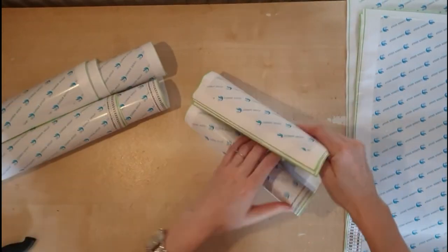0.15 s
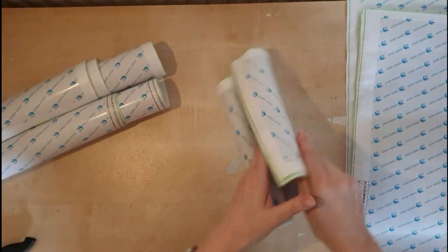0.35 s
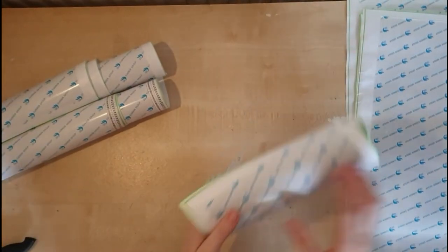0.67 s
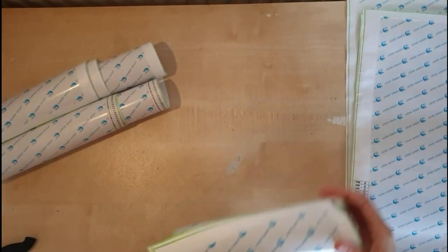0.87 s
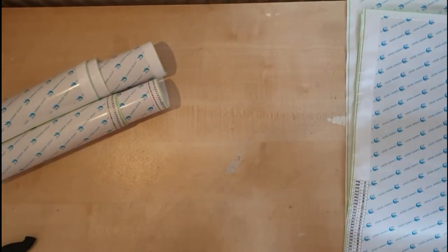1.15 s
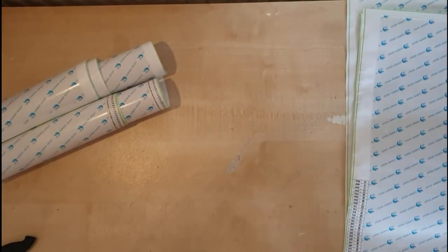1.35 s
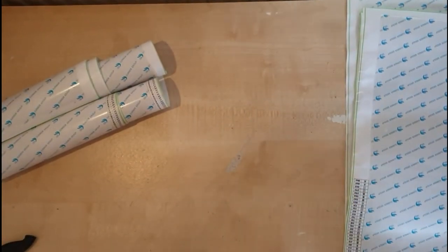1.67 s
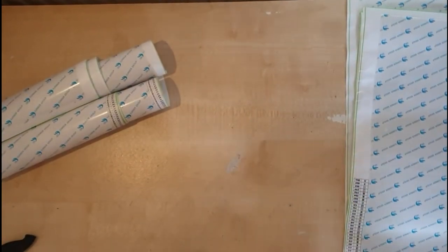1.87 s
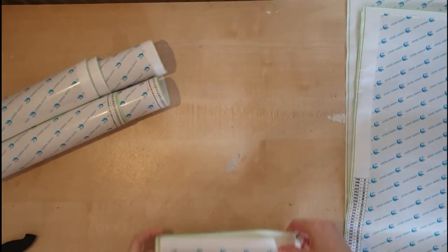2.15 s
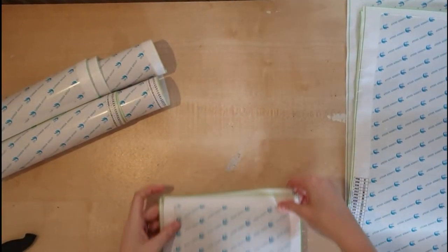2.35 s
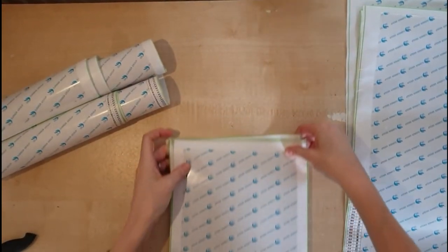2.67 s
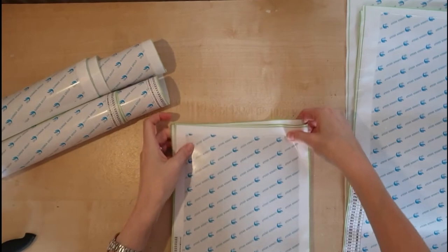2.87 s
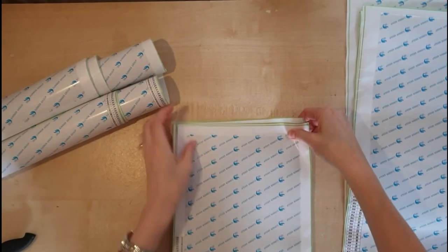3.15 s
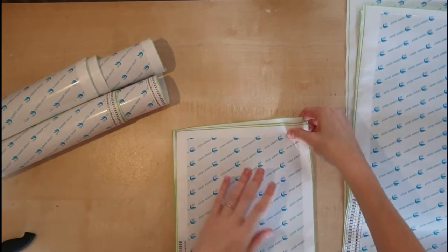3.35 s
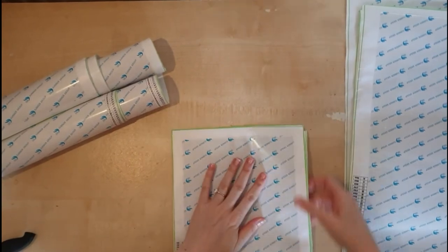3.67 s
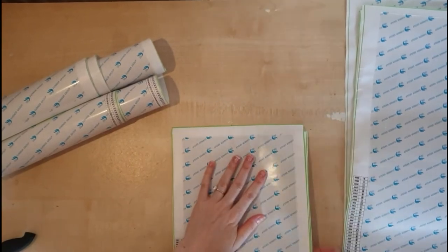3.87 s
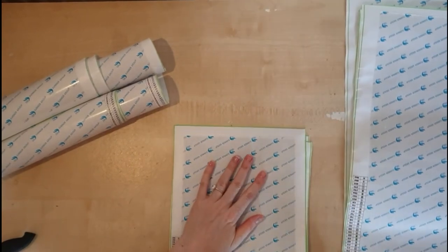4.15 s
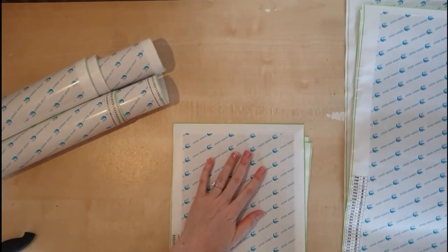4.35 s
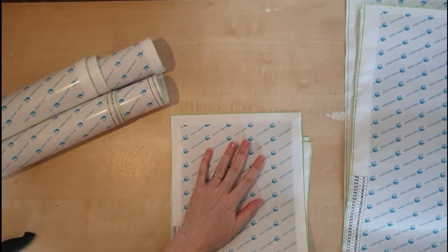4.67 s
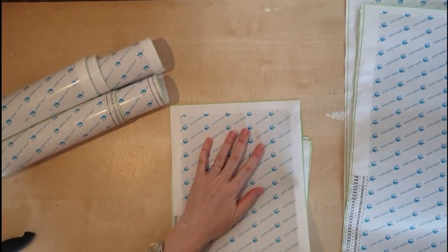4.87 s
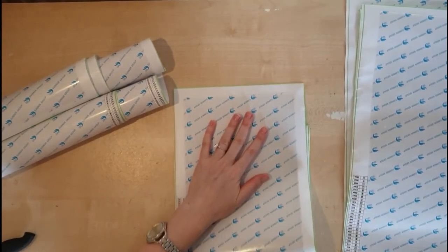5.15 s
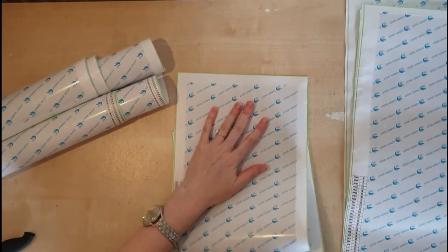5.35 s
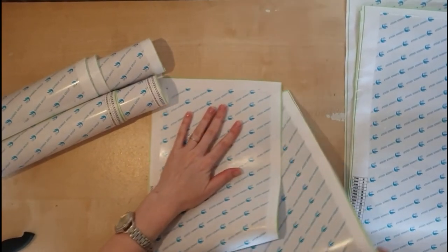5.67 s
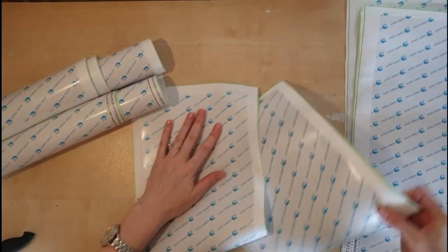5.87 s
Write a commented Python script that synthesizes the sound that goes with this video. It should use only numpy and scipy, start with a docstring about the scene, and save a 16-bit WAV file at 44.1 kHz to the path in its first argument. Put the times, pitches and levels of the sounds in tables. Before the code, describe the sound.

Plastic-covered canvas sheets rustle, hiss and crinkle as they are handled on a table, groaning over its edge, with a sharp snap midway.

```python
"""A wooden table in a small room, where stiff canvases covered with plastic film are handled.
The sheets slide with a fine hiss (shaped noise made of tiny slips), squeak and crinkle (short unsteady
tones, random clicks), snap (short rings with a burst of noise) and are patted flat (dull fading noise).
They groan over the table edge (wavering tones with jolts) before one is pulled out from under the other.
Below lie a low rumble and faint air; the room answers the sharp sounds with echoes."""
import sys
import numpy as np
from scipy import signal
from scipy.fft import rfft, irfft
from scipy.io import wavfile

SR = 44100
rng = np.random.default_rng(int(sys.argv[2]) if len(sys.argv) > 2 else 0)


def int16_out(signal):
    """Quantize to a 16-bit WAV file."""
    q = np.round(np.clip(np.atleast_2d(signal).T, -1, 1) * 32767)
    wavfile.write(sys.argv[1], SR, q.astype(np.int16))


N = 265041
TIME = np.arange(N) / SR
FREQ = np.maximum(np.arange(N // 2 + 1) * SR / N, 1)


def from_db(db):
    """Turn decibels into a gain."""
    return 10 ** (np.asarray(db) / 20)


def rms_one(x):
    """Scale a sound to an average power of 1."""
    return x / np.sqrt(np.mean(x ** 2) + 1e-20)


def in_time(rows):
    """Draw one curve over time for each column of a table."""
    times, *columns = np.transpose(rows)
    return [np.interp(TIME, times, column) for column in columns]


def over_hz(points):
    """Draw a table as a curve over frequency, spaced by pitch."""
    hz, value = np.transpose(points)
    return np.interp(np.log(FREQ), np.log(hz), value)


def drift(rate):
    """Wander smoothly at random around 0, with a spread of about 1 and `rate` new values per second."""
    knots = rng.standard_normal(N // 8)
    return np.interp(TIME * rate, np.arange(len(knots)), knots) / np.sqrt(2 / 3)


def strike(start, t60):
    """Jump up at the start, then die away by 60 dB in t60 seconds."""
    return (TIME >= start) * from_db(-60 * np.clip((TIME - start) / t60, 0, 4))


# how much louder the left side is: (frequency [Hz], left minus right [dB])
LEFT_RIGHT_BALANCE = [(100, 0.5), (400, .3), (900, 2.1), (2200, 2), (5000, 0.8), (9000, 0), (16000, -1.3)]
LEFT_LEAD_S = 5.5e-5


def at_microphones(spectra):
    """The work lies a little to the left: sound arrives earlier there, and mostly louder."""
    sides = np.array([[.5], [-.5]])
    loudness = from_db(sides * over_hz(LEFT_RIGHT_BALANCE))
    lead = np.exp(2j * np.pi * FREQ * LEFT_LEAD_S * sides)
    return irfft(spectra * loudness * lead, N)


# how alike the two sides are: (frequency [Hz], likeness [0 to 1])
SOURCE_LIKENESS = [(50, 0.95), (350, 0.73), (900, 0.6), (2000, 0.42), (4500, 0.066), (10000, 0.02)]


def noise(colour, strength=1, body=1, likeness=SOURCE_LIKENESS):
    """A wide source makes coloured stereo noise whose two sides are only partly alike; average power 1."""
    mid, side = rfft(rng.standard_normal((2, N)) * strength)
    alike = np.clip(over_hz(likeness), 0, 1)
    pair = np.sqrt(1 + alike) * mid + np.sqrt(1 - alike) * side * [[1], [-1]]
    return rms_one(at_microphones(pair * from_db(over_hz(colour)) * body))


def interference(depth_db, spacing_hz):
    """Reflections add and cancel, leaving narrow peaks and dips."""
    knots = rng.standard_normal(N // 32)
    return from_db(depth_db * np.interp(FREQ / spacing_hz, np.arange(len(knots)), knots))


def moving_noise(colour, strength, body, ripple_db, ripple_hz):
    """As the sheet moves, one pattern of peaks and dips gives way to another."""
    here = noise(colour, strength, body * interference(ripple_db, ripple_hz))
    there = noise(colour, strength, body * interference(ripple_db, ripple_hz))
    place = 2 * np.pi * 0.7085 * TIME
    return np.cos(place) * here + np.sin(place) * there


# resonances of the sheet lying on the table: (frequency [Hz], width [Hz], strength [dB])
SHEET_RESONANCES = [(143, 11, 9.5), (196.6, 17, 5.5), (327.6, 41, 5.5), (422, 35, 4.5), (529.6, 39, 6),
                    (717, 61, 2), (815, 16, 4.5), (894, 64, 0.5), (1022, 79, -1), (1140, 100, -5)]


def sheet_body(between_db):
    """The sheet strengthens sound at its resonances, over a broad base heard between them."""
    power = from_db(between_db) ** 2
    for hz, width, db in SHEET_RESONANCES:
        power = power + from_db(db) ** 2 / (1 + ((FREQ - hz) / (width / 2)) ** 2) ** 2
    return np.sqrt(power)


# colour of the still room's rumble: (frequency [Hz], relative level [dB per Hz])
RUMBLE_COLOUR = [(15, -60), (24, -34), (33, -13.5), (44, 4.5), (65, -11.5), (95, -3.5), (130, -22.5),
                 (200, -25.5), (400, -52.5)]
# colour of the air noise: (frequency [Hz], relative level [dB per Hz])
AIR_COLOUR = [(100, -1.5), (220, 4.5), (350, -0.5), (800, 0), (1350, -12), (1700, 2.5), (2000, 8),
              (2400, -1.5), (3200, -27), (7000, -59), (9000, -22), (12000, -17), (16000, -26)]
# air wafted by the moving sheet, added to the rumble: (time [s], half length [s], level [dB])
AIR_WAFTS = [(0.357, 0.022, -58.5), (2.113, 0.14, -56), (2.89, 0.053, -55), (3.538, 0.052, -52),
             (5.237, .055, -48.5)]
RUMBLE_DB, RUMBLE_WANDER_DB = -59.5, 1.65


def background():
    """A low, uneven rumble swells with each waft; beside it lies faint air noise with a band near 2 kHz."""
    waft_power = 0
    for middle, half_length, db in AIR_WAFTS:
        waft_power = waft_power + from_db(db) ** 2 / (1 + ((TIME - middle) / half_length) ** 4)
    still_gain = from_db(RUMBLE_DB + RUMBLE_WANDER_DB * drift(6.5))
    rumble_gain = np.sqrt(still_gain ** 2 + waft_power)
    return rumble_gain * noise(RUMBLE_COLOUR) + from_db(-72.5) * noise(AIR_COLOUR)


SWELL_DB, SWELL_CURVE = 22.5, 1.04  # depth that a rise or fall spans; how much its slope steepens


def swell(start, rise, hold, fall):
    """A movement speeds up, holds its speed and comes to rest; its loudness follows."""
    before = np.maximum((start + rise - TIME) / rise, 0)
    after = np.maximum((TIME - start - rise - hold) / fall, 0)
    return from_db(-SWELL_DB * np.minimum(before + after, 10) ** SWELL_CURVE)


# short brushes of a sheet; wood, flex and hiss are relative to the level, lightness is upper minus lower rasp:
# (start [s], rise [s], hold [s], fall [s], level [dB], on wood [dB], flex [dB], film hiss [dB], lightness [dB])
SHORT_BRUSHES = [(0.0, 0.0017, 0.085, 0.14, -49, -8, -18, -6.5, 3.5),
                 (0.139, 0.028, 0.061, 0.34, -57, -9.5, -21, 1, -2),
                 (0.253, 0.035, 0.083, 0.3, -52.5, -12, -20.5, -0.5, 3),
                 (0.384, 0.019, 0.014, 0.08, -42.5, -13, -41, -6.5, 2.5),
                 (0.457, 0.088, 0.056, 0.09, -61, -11, -16, 4, -4),
                 (0.61, 0.036, 0.0088, 0.11, -68.5, -5, -13, 11.5, -1),
                 (0.732, .007, .011, 0.019, -62.5, -16, -14, 17, -6),
                 (0.708, 0.023, 0.038, 0.2, -67, -2.5, -6, 11.5, 0),
                 (0.888, .012, .03, .05, -65.5, 0, -16, 9.5, 5),
                 (0.926, .015, 0.05, 0.096, -57, 0.5, -15.5, 8, 2),
                 (0.998, 0.069, .16, .1, -78, -14, -16, 8.5, 5),
                 (1.226, 0.038, 0.082, .1, -70, -12, -5, 13, -6),
                 (1.282, .09, 0.05, 0.076, -57, -3, -18, 4.5, -6),
                 (1.563, 0.16, 0.012, 0.19, -56.5, -8, -17.5, 4.5, 1),
                 (1.668, .11, 0.021, 0.2, -53.5, -15, -28, 3.5, 1),
                 (1.79, 0.32, 0.0048, 0.058, -49.5, -19, -15, 2.5, 7),
                 (3.089, 0.046, .025, 0.13, -58.5, -9, -19, 6, 5),
                 (3.172, .018, .004, 0.069, -51.5, -4.5, -12, -11, 1),
                 (3.192, 0.043, 0.028, 0.083, -61, -5, -10, -8, 0),
                 (3.415, 0.019, 0.11, 0.063, -55.5, -1.5, 0, -2, -4),
                 (3.443, 0.12, 0.33, .25, -60.5, -3, -17, 6.5, -1.5),
                 (3.933, 0.022, 0.024, 0.22, -52, -1.5, -3.5, -11, -5),
                 (3.976, 0.12, 0.023, 0.12, -56.5, 4.5, -4, 1.5, -3.5),
                 (4.094, 0.071, 0.23, 0.3, -59.5, -7, -7.5, -1.5, 0),
                 (4.457, 0.17, 0.21, .1, -56, -12.5, -16, -3, -4.5),
                 (4.635, 0.027, 0.011, 0.093, -48, -4, -15.5, -11, -4)]


def brushes():
    """Each brush drives all frictions with one swell: gains of flex, rub, rasp and hiss, then lightness."""
    for start, rise, hold, fall, level_db, wood_db, flex_db, hiss_db, lightness_db in SHORT_BRUSHES:
        loudness = from_db(level_db) * swell(start, rise, hold, fall)
        yield np.outer(from_db([flex_db, wood_db, 0, hiss_db]), loudness), lightness_db


def pull(rows, flex_db, wood_db, film_db, hiss_db, lightness_db, fade_s):
    """A long pull sounds while the sheet is in contact: gains of flex, rub, rasp and hiss, then lightness."""
    contact = np.clip(1 + np.minimum(TIME - rows[0][0], rows[-1][0] - TIME) / fade_s, 0, 1)
    shifts_db = [[flex_db], [wood_db], [film_db], [hiss_db]]
    return contact * from_db(np.array(in_time(rows)) + shifts_db), lightness_db


# both pulls, before the shifts given in friction():
# (time [s], flexing level [dB], on wood level [dB], on film level [dB], film hiss level [dB])
# the pull over the table edge
PULL_OVER_EDGE = [(2.14, -81.5, -83, -72, -60), (2.156, -62, -68, -62, -62),
                  (2.184, -49.5, -53.5, -55, -54), (2.268, -56.5, -53.5, -53.5, -57.5),
                  (2.438, -46, -46, -52, -57.5), (2.484, -59, -55, -50.5, -53.5),
                  (2.506, -44, -43.5, -48, -53.5), (2.68, -52.5, -41, -49, -62.5),
                  (2.744, -45, -41.5, -44.5, -60), (2.85, -51.5, -50, -48, -55.5),
                  (3.05, -70, -69, -68.5, -70), (3.1, -82, -76, -85, -69)]
# the pull out from under the hand
PULL_FROM_UNDER = [(4.88, -63.5, -60, -63, -64), (4.942, -67, -66, -60.5, -63),
                   (4.986, -79, -68.5, -58, -60), (5.24, -68.5, -61.5, -56.5, -59.5),
                   (5.398, -76, -55.5, -52, -53), (5.546, -58.5, -46.5, -48, -45),
                   (5.596, -56, -45.5, -43, -49), (5.706, -49.5, -44, -45.5, -51),
                   (5.764, -55, -49.5, -46.5, -50.5), (5.836, -54, -51, -48, -48.5),
                   (5.962, -77, -58, -54, -56), (6.01, -44, -46.5, -47, -52)]


def friction():
    """All movements add in power; the loudest rasp counts most for the lightness of touch."""
    moves = [*brushes(),
             pull(PULL_OVER_EDGE, flex_db=4.0, wood_db=1.5, film_db=2.5, hiss_db=1.5,
                  lightness_db=-5.0, fade_s=0.009),
             pull(PULL_FROM_UNDER, flex_db=2.0, wood_db=0.8, film_db=3.0, hiss_db=3.4,
                  lightness_db=-1.5, fade_s=0.039)]
    power = sum(gains ** 2 for gains, _ in moves) + 1e-18
    lightness_db = sum(gains[2] ** 2 * db for gains, db in moves) / power[2]
    return *np.sqrt(power), lightness_db


def slips(grain_db, per_s, clump_db):
    """Friction comes as tiny slips of uneven size, gathered in clumps."""
    return from_db(grain_db * drift(per_s) + clump_db * drift(70))


# colour of each kind of friction: (frequency [Hz], relative level [dB per Hz])
# the sheet flexing
FLEX_COLOUR = [(60, -49), (130, -11), (220, -4.5), (420, -3.5), (560, -5), (750, 3), (1400, -64)]
# rubbing on wood
RUB_COLOUR = [(350, -30), (560, -1.5), (700, 2.5), (1150, 6.5), (1400, 1), (2200, -16.5)]
# rasping on film
RASP_COLOUR = [(800, -41), (1250, -12), (1550, -1), (2000, -1), (2550, -1.5), (3300, -1), (5000, -3),
               (6500, -8), (10000, -24)]
# fine hiss of the film
HISS_COLOUR = [(2000, -50), (4000, -5.5), (5800, -1.5), (7500, 1), (9000, -4), (11500, 0), (14000, -2.5),
               (16000, -4.5)]


def sliding(flex_gain, rub_gain, rasp_gain, hiss_gain, lightness_db):
    """Friction shakes the whole sheet in the lows and hisses off the film in the highs."""
    body = sheet_body(between_db=-4)
    flex_slips = slips(grain_db=3, per_s=370, clump_db=1.5)
    flex = flex_gain * noise(FLEX_COLOUR, flex_slips, body)
    rub_slips = slips(grain_db=1.5, per_s=640, clump_db=2.0)
    rub = rub_gain * moving_noise(RUB_COLOUR, rub_slips, body, ripple_db=2.5, ripple_hz=35.07)
    rasp_slips = slips(grain_db=0.5, per_s=1700, clump_db=0.88)
    rasp = rasp_gain * moving_noise(RASP_COLOUR, rasp_slips, 1, ripple_db=4.0, ripple_hz=70.3)
    # a lighter touch shifts the rasp upwards at about the same power
    upper = irfft(rfft(rasp) / (1 + (2500 / FREQ) ** 8), N)
    upper_gain = from_db(lightness_db)
    rasp = (rasp + (upper_gain - 1) * upper) / np.sqrt((1 + upper_gain ** 2) / 2)
    hiss_slips = slips(grain_db=0.5, per_s=2800, clump_db=0.8)
    hiss = hiss_gain * noise(HISS_COLOUR, hiss_slips, interference(depth_db=1.7, spacing_hz=91))
    return flex + rub + rasp + hiss


# colour of cracking film, also heard in the snaps: (frequency [Hz], relative level [dB per Hz])
CRACK_COLOUR = [(300, -60), (1000, 10.5), (2200, 9), (4000, 13), (6000, 9), (9000, -1), (16000, -15)]


def crinkles(rasp_gain, per_s, size_db, spread_db, t60):
    """Creases in the film let go at random, louder the harder the sheets rub."""
    random_db = spread_db * np.minimum(rng.exponential(1, N), 3)
    sizes = rasp_gain * from_db(size_db + random_db)
    clicks = sizes * (rng.random(N) < per_s / SR) + 1e-18
    decay = np.exp(-np.log(1000) / (t60 * SR))
    return signal.lfilter([1], [1, -decay], clicks) * noise(CRACK_COLOUR)


# film catching and singing: (time [s], half length [s], pitch [Hz], level [dB], pitch spread [Hz])
FILM_SQUEAKS = [(0.005, 0.018, 419, -52.5, 34), (0.09, 0.077, 474, -66.5, 50.7),
                (0.35, 0.055, 1030, -59.5, 125), (2.074, 0.031, 1710, -68, 104),
                (2.462, 0.009, 690, -36, 25.9), (3.57, 0.0048, 480, -53, 29.4),
                (4.608, .075, 1733, -63, 117.5), (4.665, 0.006, 893, -41.5, 25.2),
                (4.667, 0.01, 1670, -45.5, 35.3)]


def squeaks(flutter_db):
    """The film sticks and slips fast and unsteadily, giving short swelling tones."""
    out = np.zeros(N)
    for middle, half_length, hz, level_db, width in FILM_SQUEAKS:
        phase = 2 * np.pi * np.cumsum(hz + width * drift(600)) / SR
        bell = np.exp(-.5 * np.minimum(((TIME - middle) / half_length) ** 2, 100))
        gain = from_db(level_db + flutter_db * drift(300)) * bell
        out += np.sqrt(2) * gain * np.sin(phase)
    return out


# the sheet buckles: (time [s], level [dB], crack relative to the ring, before an 8 dB cut [dB])
BUCKLES = [(0.306, -39, 3), (0.411, -49, 22.5), (0.425, -51, 24), (0.8975, -64, 0), (0.94, -58, -9),
           (2.159, -44.5, -14), (2.434, -37, -18), (2.818, -29, 0), (4.2111, -12, -17.5),
           (4.2122, -22, -15), (4.2163, -25, -25), (4.818, -35, 1.5), (4.824, -35, 4), (5.613, -38.5, 11),
           (5.975, -39.5, -9), (6.0, -39, -17)]
# ring of a buckle, before the bass and top are softened: (frequency [Hz], level [dB], time to fall 60 dB [s])
BUCKLE_RING = [(420, -35, 0.05), (543, -19, 0.092), (798, -21, 0.015), (879, -5.5, 0.029),
               (1008, -11.5, 0.021), (1407, -9, 0.011), (1680, -12.5, 0.017), (1846, -7, 0.016),
               (2520, -40, 0.0076), (3124, -19.5, 0.034)]


def snaps(crack_t60, soft_hz, low_cut_hz):
    """Each buckle rings the sheet briefly while the film cracks; a thin sheet radiates little bass."""
    clicks, crack, rings = np.full(N, 1e-18), 0, 0
    for start, level_db, crack_db in BUCKLES:
        clicks[round(start * SR)] = -from_db(level_db)
        crack = crack + from_db(level_db + crack_db - 8.0) * strike(start, crack_t60)
    for hz, level_db, t60 in BUCKLE_RING:
        decay = np.exp(-np.log(1000) / (t60 * SR))
        turn = 2 * np.pi * hz / SR
        ring = signal.lfilter([0, np.sin(turn)], [1, -2 * decay * np.cos(turn), decay * decay], clicks)
        rings = rings + from_db(level_db) * ring
    band = signal.butter(2, [low_cut_hz, soft_hz], "band", fs=SR, output="sos")
    rings = signal.sosfilt(band, rings)
    return at_microphones(rfft(rings)) + crack * noise(CRACK_COLOUR)


# hands and sheet land on the table: (time [s], level [dB], time to fall 60 dB [s])
TABLE_PATS = [(1.206, -57, 0.19), (2.159, -48.5, .1), (2.18, -45.5, .1), (2.395, -38, .15),
              (2.432, -41, .1), (3.43, -49, 0.26), (3.524, -51.5, 0.32), (3.956, -52, 0.22),
              (4.214, -45, 0.2), (4.816, -48, 0.25), (6.0, -49, 0.09)]
# colour of a pat: (frequency [Hz], relative level [dB per Hz])
PAT_COLOUR = [(50, -4), (130, 4), (250, -4.5), (450, -7), (800, -19), (1500, -15.5), (5000, -43)]


def pats():
    """Soft contacts with the table top give dull bursts that die away."""
    loudness = sum(from_db(level_db) * strike(start, t60) for start, level_db, t60 in TABLE_PATS)
    return loudness * noise(PAT_COLOUR, body=sheet_body(between_db=-3))


# stick-slip over the table edge; the glide stops at the slowest slip rate, roughness is relative to the level:
# (start [s], rise [s], hold [s], fall [s], slip rate [Hz], glide [Hz per s], level [dB], roughness [dB])
EDGE_GROANS = [(2.197, 0.036, 0.075, 0.052, 309.4, 159.5, -40, -20),
               (2.318, 0.014, 0.027, 0.096, 312.4, -100, -42, -12),
               (2.4, 0.035, 0.013, 0.2, 365.2, -450, -46.5, -4),
               (2.644, .14, 0.053, 0.12, 284, -720, -38.5, -7.5),
               (2.687, .05, 0.12, 0.06, 433, -110, -45.5, -19),
               (2.8, 0.068, .03, 0.12, 208.2, -150, -47, -12)]
SLOWEST_SLIP_HZ, OVERTONE_FLUTTER_DB = 90.8, 4


def groans(jitter, flutter_db, second_db, third_db):
    """The canvas sticks and slips on the table edge; each groan's pitch glides up or down at its own rate."""
    wave, jolting = 0, 0
    for start, rise, hold, fall, hz, glide, level_db, rough_db in EDGE_GROANS:
        rate = np.maximum(hz + glide * (TIME - start), SLOWEST_SLIP_HZ)
        phase = 2 * np.pi * np.cumsum(rate * (1 + jitter * drift(150))) / SR
        gain = from_db(level_db + flutter_db * drift(90)) * swell(start, rise, hold, fall)
        second_gain = from_db(second_db + OVERTONE_FLUTTER_DB * drift(40))
        third_gain = from_db(third_db + OVERTONE_FLUTTER_DB * drift(40))
        tone = np.sin(phase) + second_gain * np.sin(2 * phase) + third_gain * np.sin(3 * phase)
        wave = wave + gain * tone
        # every slip also gives the sheet an uneven jolt
        jolting = jolting + gain * from_db(rough_db) * np.maximum(np.cos(phase), 0) ** 2
    jolt_level = np.sqrt(np.mean(jolting ** 2) * 16 / 3)
    jolts = jolt_level * noise(FLEX_COLOUR, jolting, sheet_body(between_db=-18))
    return np.sqrt(2) * wave + jolts


# colour of the echoes: (frequency [Hz], relative level [dB])
ROOM_COLOUR = [(80, 11), (300, -3.5), (850, -4.5), (1300, -2.5), (1850, -10), (2600, -2), (4000, -6.5),
               (8000, -7), (16000, -7.5)]
# how alike the echoes are on both sides: (frequency [Hz], likeness [0 to 1])
ECHO_LIKENESS = [(100, 0.65), (400, 0.91), (900, 0.015), (2000, 0.36), (10000, 0.48)]


def room(x, t60, wet_db, ceiling_s, ceiling_db):
    """A dense echo tail starts almost at once and dies away; a faint, shorter ceiling reflection joins it."""
    envelope = strike(0.0037, t60) + from_db(ceiling_db) * strike(ceiling_s, t60 / 3)
    response = (noise(ROOM_COLOUR, likeness=ECHO_LIKENESS) * envelope)[:, :SR // 2]
    response /= np.sqrt(np.mean(np.sum(response ** 2, axis=1)))
    return from_db(wet_db) * signal.fftconvolve(x, response, axes=1)[:, :N]


def scene():
    """Add up all the handling on the table; only the sharp sounds get room echoes."""
    flex, rub, rasp, hiss, lightness_db = friction()
    slides = sliding(flex, rub, rasp, hiss, lightness_db)
    sharp = crinkles(rasp, per_s=40, size_db=-8, spread_db=1.5, t60=0.0096)
    sharp = sharp + at_microphones(rfft(squeaks(flutter_db=3.0)))
    sharp = sharp + snaps(crack_t60=0.034, soft_hz=3980, low_cut_hz=560)
    edge = groans(jitter=0.04, flutter_db=2.2, second_db=-10.5, third_db=-19)
    echoes = room(sharp, t60=0.25, wet_db=-4, ceiling_s=0.015, ceiling_db=-15)
    return background() + slides + sharp + pats() + edge + echoes


def record(dry):
    """Cut the top steeply above 15750 Hz."""
    return signal.sosfilt(signal.ellip(12, .1, 80, 15750, fs=SR, output="sos"), dry)


dry = scene()
out = record(dry)
int16_out(out)
```